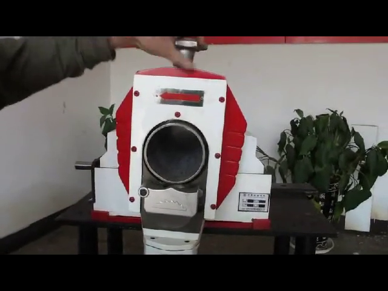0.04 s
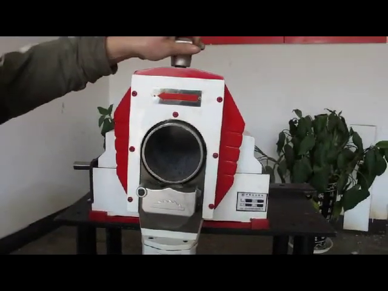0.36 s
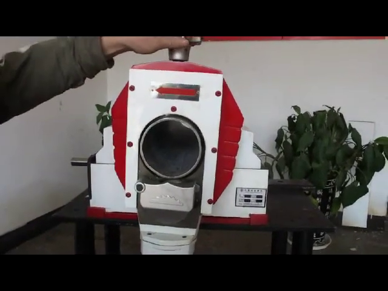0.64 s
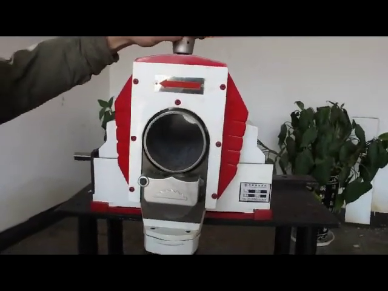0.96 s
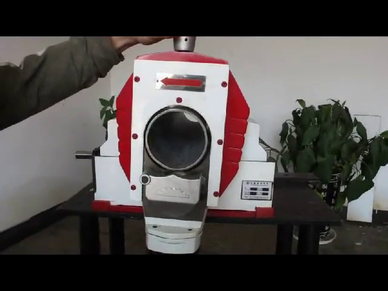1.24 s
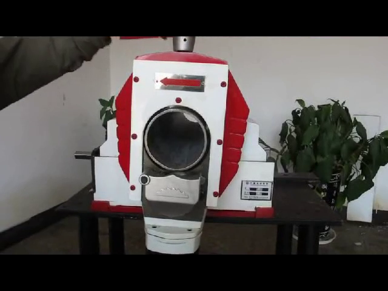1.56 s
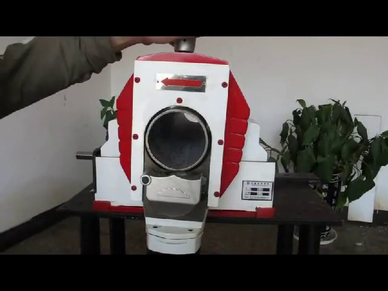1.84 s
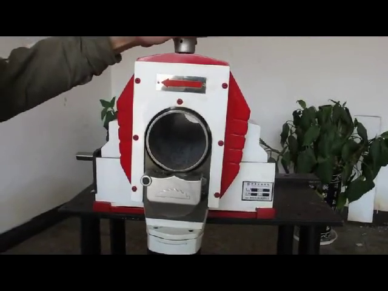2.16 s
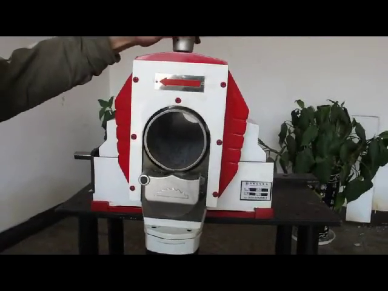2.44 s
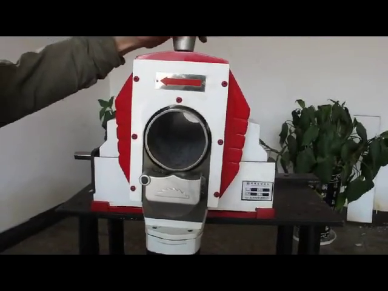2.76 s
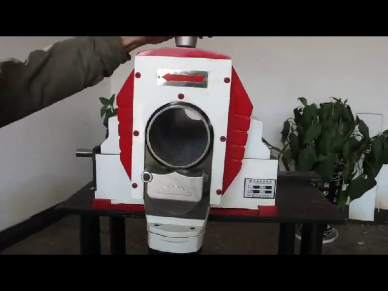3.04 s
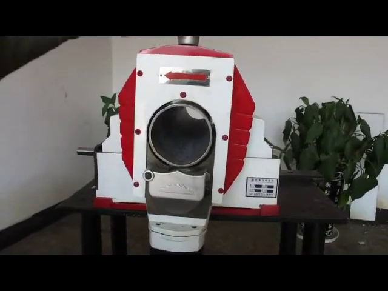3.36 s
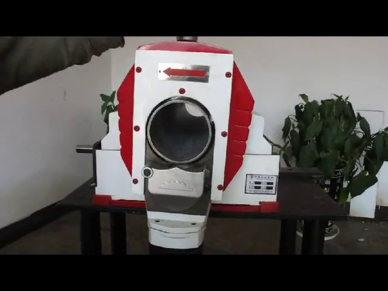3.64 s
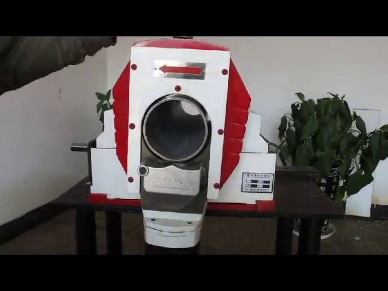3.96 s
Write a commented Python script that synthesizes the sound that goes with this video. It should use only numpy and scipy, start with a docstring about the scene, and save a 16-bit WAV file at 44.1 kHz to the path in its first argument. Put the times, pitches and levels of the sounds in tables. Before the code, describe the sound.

A bench machine grinds metal in a hard-walled room. After a brief rising whine, a loud, gritty hiss sets in at about 0.1 seconds, with shrill chatter and metallic ringing over a steady hum and rumble. Around 1.5 seconds the grinding falls away and the motor whine climbs. It bites again at 1.7, eases briefly near 3.4, then continues loudly until 4 seconds.

```python
"""Cutting a steel pipe

A bench pipe cutter is fed by hand into a steel pipe, in a hard-walled room.
Friction and snapping chips make a gritty hiss; the teeth catch the wall in a shrill chatter
and the pipe rings, over the machine's hum and rumble.
Twice the feed eases: the grinding falls away and the motor's whine climbs."""
import sys
import numpy as np
from scipy import signal
from scipy.fft import rfft, irfft, next_fast_len
from scipy.io import wavfile
from scipy.ndimage import uniform_filter1d, minimum_filter1d

SR = 44100
rng = np.random.default_rng(int(sys.argv[2]) if len(sys.argv) > 2 else 0)


def persist_wave(psi):
    """Save psi, clipped to +-1, as 16-bit WAV."""
    counts = np.round(np.clip(psi, -1, 1) * 32767).astype(np.int16)
    wavfile.write(sys.argv[1], SR, np.atleast_2d(counts).T)


N = 176400


def amp(db):
    """Decibels to gain."""
    return 10 ** (np.asarray(db) / 20)


def unit(x):
    """Scales to rms 1."""
    return x / np.sqrt(np.mean(abs(x) ** 2) + 1e-20)


def curve(points):
    """A control curve, one value per sample."""
    return np.interp(np.arange(N) / SR, *np.transpose(points))


def at_hz(points, hz):
    """A table's value on a log-frequency axis."""
    knots_hz, value = np.transpose(points)
    return np.interp(np.log(hz + 1), np.log(knots_hz), value)


def bins_hz():
    """Frequencies of the whole-length, padded spectrum."""
    return np.fft.rfftfreq(next_fast_len(N + SR // 10), 1 / SR)


def colour(x, gain):
    """Filters by a gain per frequency."""
    size = next_fast_len(N + SR // 10)
    return irfft(rfft(x, size) * gain, size)[..., :N]


def drift(rate_hz):
    """Random wander up to about this rate, rms 1."""
    return unit(colour(rng.standard_normal(N), 1 / (1 + (bins_hz() / rate_hz) ** 4)))


def ripple(hz, spacing_hz):
    """Uneven peaks and dips along the frequency axis."""
    knots_hz = np.arange(0, SR, spacing_hz)
    return np.interp(hz, knots_hz, rng.standard_normal(SR)[:len(knots_hz)])


def swell(centre_s, length_s):
    """A smooth rise and fall, above half height for length_s."""
    return .5 ** ((2 * (np.arange(N) / SR - centre_s) / length_s) ** 2)


def wavering_phase(hz, waver_hz, rate_hz):
    """Phase in radians of a wandering pitch."""
    return 2 * np.pi * np.cumsum(hz + waver_hz * drift(rate_hz)) / SR


def tone(hz, waver_hz, rate_hz, flutter_db):
    """A sine whose pitch and level waver, rms 1."""
    phase = wavering_phase(hz, waver_hz, rate_hz)
    return unit(np.sin(phase) * amp(flutter_db * drift(rate_hz)))


# Each row: frequency in Hz, left-right coherence (1 = alike).
COHERENCE = [(50, 0.98), (1300, 0.87), (2500, 0.8), (4000, 0.99), (5500, 1), (8000, 0.17), (15000, .3)]

def spread(pair):
    """Makes two unrelated channels partly alike."""
    coherence = np.clip(at_hz(COHERENCE, bins_hz()), -1, 1)
    right = colour(pair[0], coherence) + colour(pair[1], np.sqrt(1 - coherence ** 2))
    return np.array([pair[0], right])


# Each row: frequency in Hz, the room's 60 dB decay time in seconds.
ROOM_T60_S = [(100, 0.14), (1500, 0.87), (6000, 0.38), (15000, 0.072)]

def room(x, low_wet_db=-13, high_wet_db=-1):
    """Hard walls add a diffuse tail per side, with a larger share in the treble."""
    hz, t, noise = signal.stft(rng.standard_normal((2, SR // 2)), SR, nperseg=256)
    decay = amp(-60 * t / at_hz(ROOM_T60_S, hz)[:, None])
    tail = signal.istft(noise * decay, SR, nperseg=256)[1]
    wet = signal.fftconvolve(x[None], tail / np.linalg.norm(tail[0]), axes=1)[:, :N]
    share = amp(at_hz([(1400, low_wet_db), (4500, high_wet_db)], bins_hz()))
    return colour(x + colour(wet, share), 1 / np.sqrt(1 + share ** 2))


# Rumble spectrum. Each row: frequency in Hz, relative density in dB.
RUMBLE_SPECTRUM_DB = [(25, -7), (45, -11), (75, -5), (150, -7), (300, -1.5), (600, 0), (1100, 3),
                      (2000, 7.5), (3200, 1.5), (5500, -9.5), (8000, -5), (12000, -31)]

def rumble(level_db=-36.5):
    """Steady noise of the gears and the cooling fan."""
    noise = spread(rng.standard_normal((2, N)))
    return amp(level_db) * unit(colour(noise, amp(at_hz(RUMBLE_SPECTRUM_DB, bins_hz()))))


# Housing hum. Each row: time in seconds, relative level in dB.
HUM_DB = [(0.0, -57), (0.5, -62), (1.22, -56.5), (1.38, -43.5), (1.56, -61), (2.29, -48.5), (2.33, -57.5),
          (3.0, -59), (3.02, -52), (3.22, -48), (3.32, -60), (4.0, -51.5)]
# Gear whines. Each row: start in seconds, length in seconds, first and last pitch in Hz, level in dB.
WHINES = [(0.022, 0.22, 5110, 5195, -32.5), (1.424, 0.29, 4975, 5170, -39), (1.549, 0.11, 2580, 2695, -39),
          (3.33, 0.16, 4990, 5080, -46)]

def motor(hum_db=2.5, drone_db=-66):
    """Housing hum, low drone, and a gear whine that climbs at moments of light load."""
    t = np.arange(N) / SR
    out = tone(350, waver_hz=2.6, rate_hz=14.5, flutter_db=0.5) * amp(curve(HUM_DB) + hum_db)
    out += tone(69, waver_hz=2.47, rate_hz=7.5, flutter_db=6.5) * amp(drone_db)
    for start_s, length_s, from_hz, to_hz, db in WHINES:
        progress = np.clip((t - start_s) / length_s, 0, 1)
        whine = tone(from_hz + (to_hz - from_hz) * progress, waver_hz=6, rate_hz=50, flutter_db=1)
        out += whine * amp(db) * np.sqrt(4 * progress * (1 - progress))
    return out


# The pipe's low mode, rising unevenly as the cut deepens. Each row: time in seconds, pitch in Hz.
RING_HZ = [(.45, 1241), (.75, 1235), (1.0, 1263), (1.95, 1256), (2.28, 1270), (3.1, 1278), (3.35, 1248),
           (3.55, 1262)]
# The low mode's strength. Each row: time in seconds, relative level in dB.
RING_DB = [(0, -29), (.16, -35.5), (.195, -13), (.24, -22), (.45, -21.5), (.6, -30), (.8, -32.5),
           (.97, -27), (1.34, -23.5), (1.4, -30), (1.6, -32.5), (1.78, -27.5), (2.27, -23.5), (2.4, -32.5),
           (3.2, -30.5), (3.36, -32.5), (3.55, -18), (3.66, -32), (3.78, -14), (4, -29)]
# Brief rings and squeaks. Each row: centre in seconds, length in seconds, pitch in Hz, level in dB.
MODE_FLARES = [(.19, .07, 565, -42), (.205, .07, 2482, -27), (.46, .08, 2480, -23.5), (.57, .12, 5340, -31),
               (1.46, .08, 2472, -35.5), (1.75, .11, 4172, -32), (2.85, .2, 5305, -30)]

def pipe_rings(low_mode_db=-2.5):
    """The pipe's low mode sings under the rubbing blade; other modes flare briefly."""
    out = tone(curve(RING_HZ), waver_hz=6, rate_hz=30, flutter_db=2.5)
    out *= amp(curve(RING_DB) + low_mode_db)
    for centre_s, length_s, hz, db in MODE_FLARES:
        ring = tone(hz, waver_hz=9, rate_hz=40, flutter_db=2.5)
        out += ring * swell(centre_s, length_s) * amp(db)
    return out


def friction(chips_per_s=1500, chips_db=-11, chip_spread_db=7.5, grit_db=0.77, flutter_db=1.17):
    """The force at the cut: gritty rubbing plus the impulses of snapping chips."""
    sizes = amp(chip_spread_db * np.minimum(rng.exponential(1, N), 4.5))
    snaps = rng.random(N) < chips_per_s / SR
    chips = unit(sizes * snaps * rng.choice([-1, 1], (2, N)))
    rub = unit(rng.standard_normal((2, N)) * amp(grit_db * drift(300)))
    return spread(unit(rub + amp(chips_db) * chips)) * amp(flutter_db * drift(41))


# Hiss spectrum. Each row: frequency in Hz, relative density in dB.
HISS_SPECTRUM_DB = [(300, -27.5), (600, -27.5), (1000, -10.5), (1500, -4), (2200, -4), (3000, -8.5),
                    (3700, -5.5), (4600, -2.5), (5300, 3.5), (5900, 3), (6800, -11), (7800, -12),
                    (8400, -17.5), (9200, -19), (9700, -28), (10700, -27.5), (11500, -35.5), (15500, -46.5)]
# Resonances. Each row: centre in Hz, half-width in Hz, relative level in dB, 1 if shrill under pressure.
STEEL_MODES = [(568, 59, -24, 0), (655, 21, -26, 0), (1177, 26, -19, 0), (1345, 9.8, -7.5, 1),
               (1908, 15, -16, 0), (2076, 95, -13, 1), (2497, 11.4, -14, 0), (2550, 23, -25, 0),
               (2747, 140, -15, 0), (3250, 120, -14.5, 1), (3753, 130, -13, 0), (3956, 43, -9.5, 1),
               (4207, 61, -15.5, 0), (4960, 9.3, -23, 0), (5320, 13, -7.5, 1), (6630, 66, -12.5, 1),
               (7456, 40, -19, 0), (7560, 65, -22, 0), (7920, 16, -16.5, 1)]

def steel_response(hz):
    """Gains of pipe and blade per frequency: the hiss with its plain modes, and the shrill modes."""
    ripple_db = ripple(hz, spacing_hz=45) * at_hz([(1000, 0.32), (8000, 3.2), (12000, 4.8)], hz)
    hiss_power = unit(amp(at_hz(HISS_SPECTRUM_DB, hz) + ripple_db)) ** 2
    shrill_power = np.zeros_like(hz)
    for centre_hz, half_width_hz, db, is_shrill in STEEL_MODES:
        peak = amp(db) * unit(1 / (1 + ((hz - centre_hz) / half_width_hz) ** 2))
        if is_shrill:
            shrill_power += peak ** 2
        else:
            hiss_power += peak ** 2
    return np.sqrt(hiss_power), np.sqrt(shrill_power)


# How hard the blade bites; also drives the chatter. Each row: time in seconds, relative level in dB.
BITE_DB = [(0, -39.5), (.11, -36), (.135, -27), (.19, -24.5), (.31, -26), (.5, -23.5), (.61, -23),
           (.82, -28.5), (.91, -23), (1.05, -24.5), (1.1, -26.5), (1.36, -25), (1.43, -30.5), (1.5, -39.5),
           (1.66, -38.5), (1.68, -25.5), (1.8, -21.5), (1.87, -27.5), (1.94, -25), (1.96, -28),
           (2.04, -22.5), (2.35, -27.5), (2.42, -21.5), (2.53, -23.5), (2.68, -25.5), (2.87, -22),
           (3.12, -25.5), (3.3, -26.5), (3.34, -32.5), (3.42, -36), (3.54, -24), (3.66, -20.5), (3.83, -26),
           (3.9, -21.5), (4, -22.5)]
# Shrillness from feed pressure; also drives the chatter. Each row: time in seconds, relative level in dB.
SHRILL_DB = [(0, -10), (.4, -19), (.6, -2), (.78, -9.5), (.98, -2), (1.25, -6), (1.6, -12), (1.8, -6.5),
             (1.95, -6), (2.12, -3.5), (2.28, 0.5), (2.45, -4), (2.9, -0.5), (3.2, -1.5), (3.4, -7),
             (3.62, -1), (3.78, -6), (4, 2)]
# Rasps at the top of the hiss. Each row: centre in seconds, length in seconds, nominal boost in dB.
TREBLE_RASPS = [(0.603, 0.15, 0.5), (1.815, 0.064, 2), (2.538, 0.14, 3.5), (2.9, 0.092, 3.5),
                (3.675, 0.078, 3), (3.953, .09, 2.5)]

def grinding(level_db=4.0, shrill_trim_db=-0.5, flicker_db=1.17, brighten=0.45, steadiness=0.75):
    """Friction hisses through pipe and blade, brighter with the bite; shrill modes sing under pressure."""
    hz, bite_db = bins_hz(), curve(BITE_DB)
    excess_db = bite_db - np.median(bite_db)
    force = friction()
    hiss_gain, shrill_gain = steel_response(hz)
    hiss = colour(force, hiss_gain)
    top = colour(hiss, at_hz([(6200, 0.093), (7800, 0.9)], hz))
    rasp_db = sum(db * swell(centre_s, length_s) for centre_s, length_s, db in TREBLE_RASPS)
    rasp_db *= 1 + 0.42 * drift(150)
    hiss += top * (amp(brighten * excess_db + rasp_db + flicker_db * drift(24)) - 1)
    body = colour(hiss, at_hz([(3500, 0.94), (6500, 0)], hz))
    hiss += body * (amp(-steadiness * np.maximum(excess_db, 0)) - 1)  # held back on hard bites
    singing = colour(spread(rng.standard_normal((2, N))), shrill_gain)
    singing *= amp(curve(SHRILL_DB) + shrill_trim_db)
    return (hiss + singing) * amp(bite_db + level_db)


# Chatter rate. Each row: time in seconds, pitch in Hz.
CHATTER_PITCH_HZ = [(0, 1296), (.3, 1302), (.38, 1287), (.6, 1315), (.84, 1288), (.9, 1303), (1.4, 1299),
                    (1.75, 1306), (1.97, 1287), (2.12, 1320), (2.27, 1277), (2.33, 1308), (2.46, 1315),
                    (2.7, 1294), (2.8, 1316), (3.42, 1287), (3.62, 1304), (3.78, 1299), (4, 1304)]
# The teeth dig in. Each row: centre in seconds, length in seconds, relative level in dB.
CHATTER_SURGES = [(0.276, 0.055, -17.5), (0.581, 0.02, -14.5), (.65, 0.021, -19), (.919, 0.021, -21.5),
                  (0.973, 0.02, -15.5), (1.045, .035, -19), (1.158, 0.052, -19.5), (1.315, 0.088, -17.5),
                  (1.81, 0.1, -20), (2.027, 0.073, -20.5), (2.147, 0.051, -19), (2.402, 0.075, -24.5),
                  (2.508, 0.091, -19), (2.655, 0.066, -18.5), (2.752, 0.046, -18.5), (2.883, 0.039, -15.5),
                  (3.119, 0.091, -20.5), (3.258, 0.052, -23.5), (3.602, .07, -16), (3.959, .08, -14)]
# Chatter harmonics from the second up. Each entry: relative level in dB.
HARMONICS_DB = [-5.5, -10, -7, -20, -13]

def chatter(steady_db=-1.0, surge_db=1.0, flutter_db=2, harmonic_flutter_db=3, turn_hz=43.7):
    """The teeth catch the wall in a nearly regular train; the blade wobbles once a turn."""
    phase = wavering_phase(curve(CHATTER_PITCH_HZ), waver_hz=8, rate_hz=45)
    wobble = 1 + 0.068 * np.sin(wavering_phase(turn_hz, waver_hz=6, rate_hz=9.7))
    bite_db = curve(BITE_DB)
    surges = sum(amp(db + surge_db) * swell(centre_s, length_s)
                 for centre_s, length_s, db in CHATTER_SURGES)
    squeal = unit(np.sin(phase) * amp(flutter_db * drift(25)))
    squeal *= np.hypot(amp(bite_db + steady_db), surges)
    harmonics = sum(amp(db) * unit(np.sin(k * phase) * amp(harmonic_flutter_db * drift(52)))
                    for k, db in enumerate(HARMONICS_DB, start=2))
    return (squeal + harmonics * amp(bite_db + curve(SHRILL_DB) / 2)) * wobble


def scene():
    """Grinding and rumble, with chatter, pipe and motor echoing in the room."""
    return grinding() + rumble() + room(chatter() + pipe_rings() + motor())


# Stereo balance. Each row: frequency in Hz, left minus right in dB.
BALANCE_DB = [(50, -2.5), (1300, 0.06), (4500, -1.3), (5300, 3), (6100, -1), (7000, -11.5), (7700, -12),
              (9200, -14.5), (11000, -11), (15000, -6.5)]
# Stereo phase. Each row: frequency in Hz, lead of the left side in radians.
LEFT_LEAD_RAD = [(50, 0.14), (1300, -0.06), (2400, -0.46), (4900, -1.73), (5500, -1.57), (7500, -2.5),
                 (9000, -1.8), (15000, -0.5)]

def record(dry, ceiling=0.94, cutoff_hz=15720):
    """Two microphones, the left duller in the treble; a soft peak limiter; a low-pass."""
    hz = bins_hz()
    left_gain = amp(at_hz(BALANCE_DB, hz) / 2) * np.exp(.5j * at_hz(LEFT_LEAD_RAD, hz))
    heard = colour(dry, np.array([left_gain, 1 / left_gain]))
    limiter_gain = 1 / (1 + (abs(heard).max(0) / ceiling) ** 4) ** .25
    heard *= uniform_filter1d(minimum_filter1d(limiter_gain, size=90), size=90)
    lowpass = signal.firwin(511, cutoff_hz, window=("kaiser", 9), fs=SR)
    return signal.oaconvolve(heard, lowpass[None], "same")


dry = scene()
out = record(dry)
persist_wave(out)
```